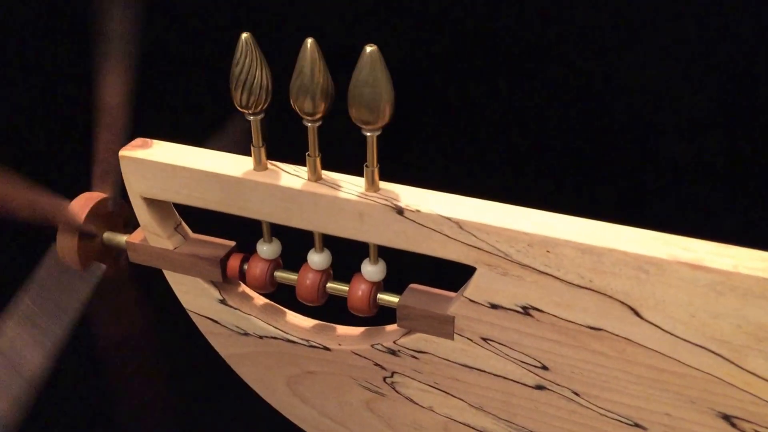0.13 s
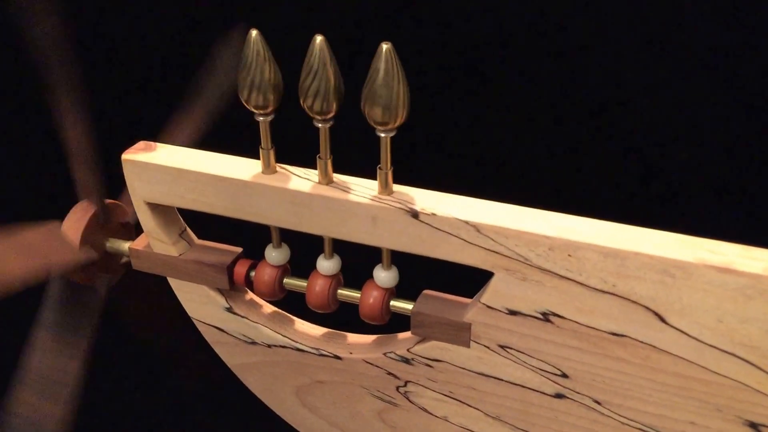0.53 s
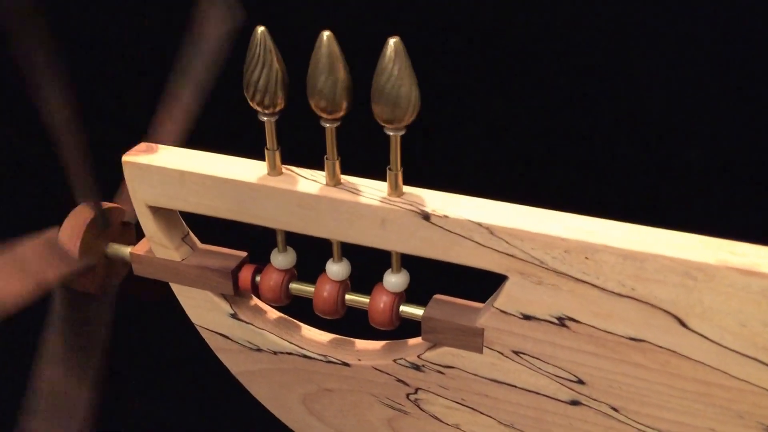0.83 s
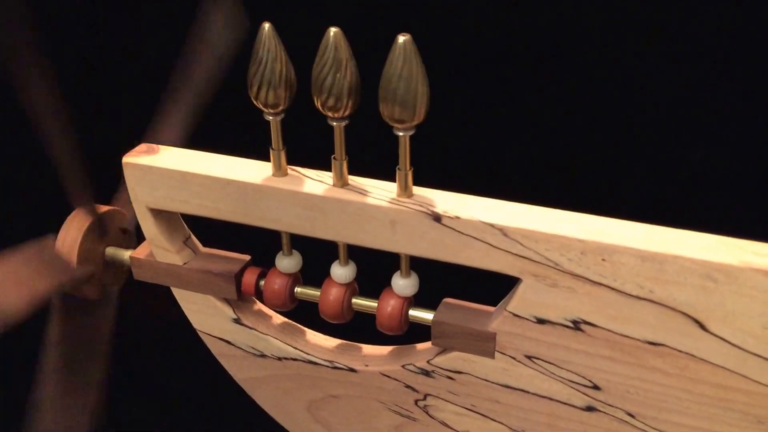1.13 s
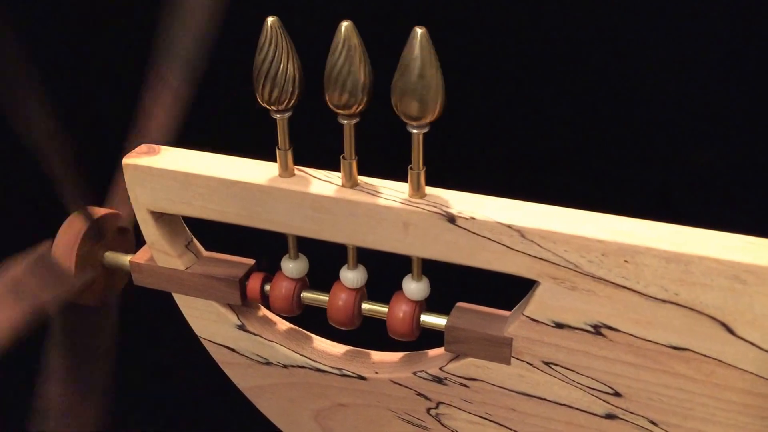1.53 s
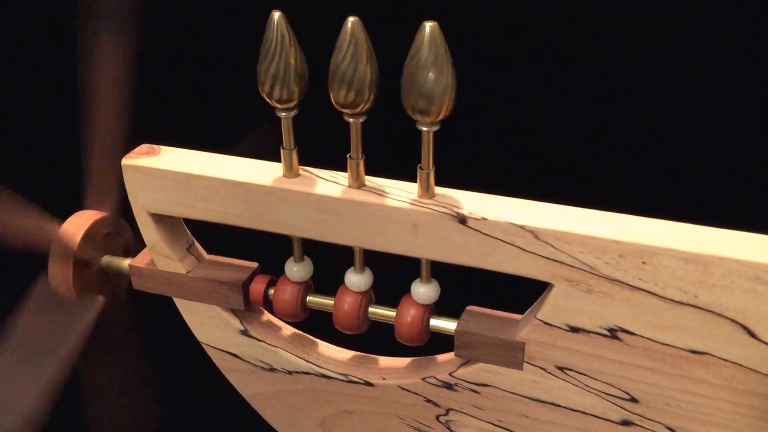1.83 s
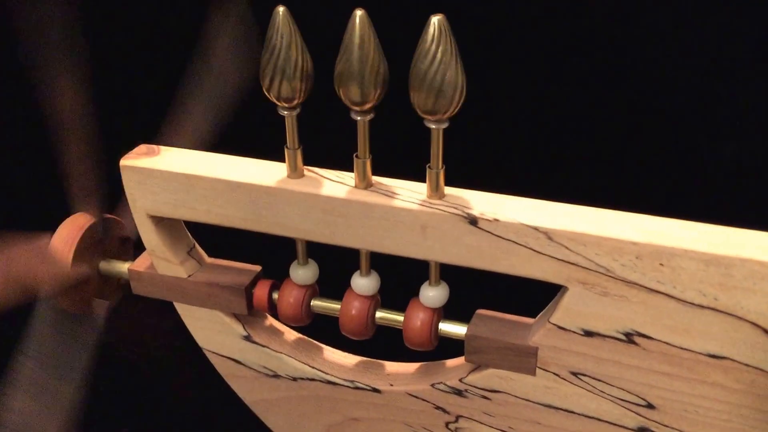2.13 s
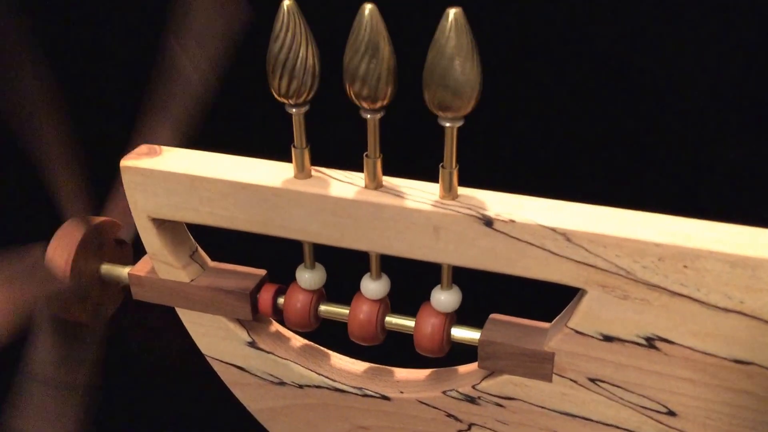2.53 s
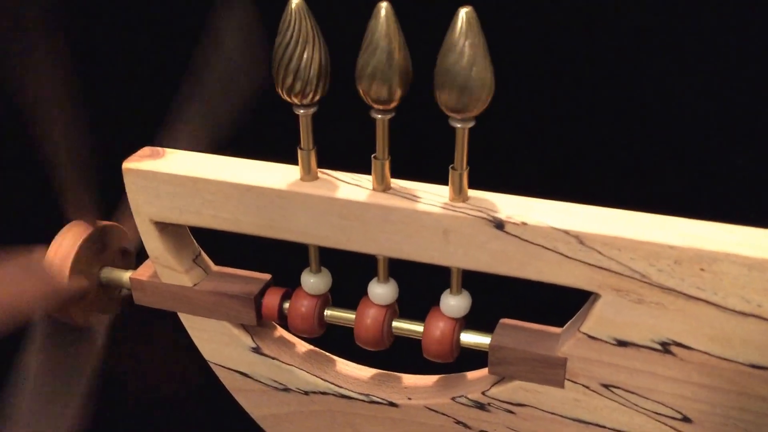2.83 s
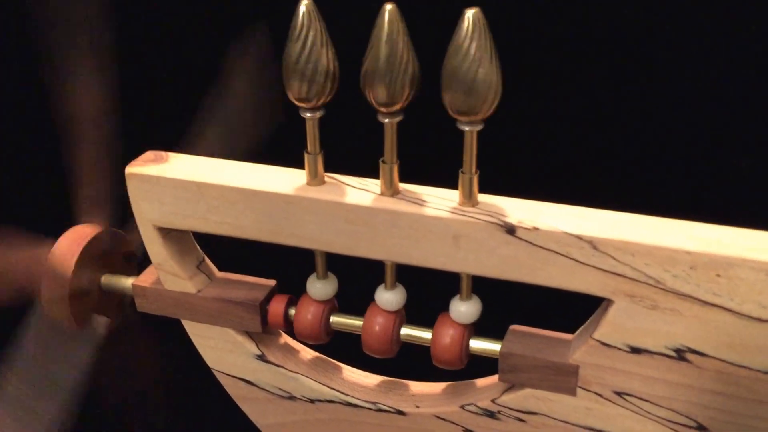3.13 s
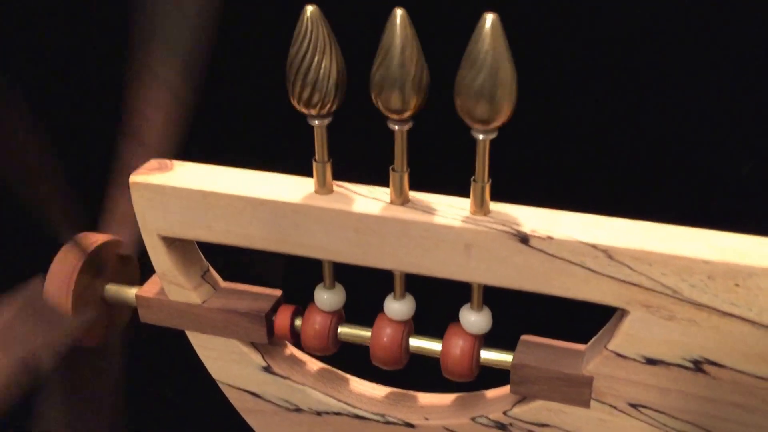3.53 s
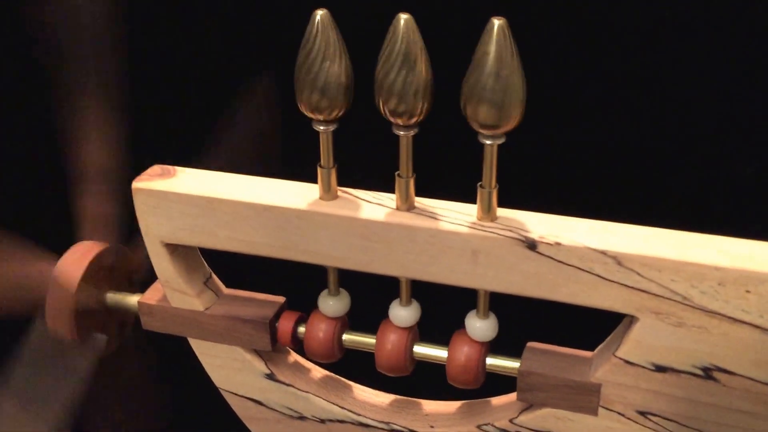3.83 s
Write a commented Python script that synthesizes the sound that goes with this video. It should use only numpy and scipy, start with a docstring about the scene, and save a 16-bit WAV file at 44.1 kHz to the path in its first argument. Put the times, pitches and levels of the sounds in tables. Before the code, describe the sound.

Wooden followers rub, tick and chatter on a turning camshaft, sparse at first, dense and bright by the end, with soft draught thumps on a close microphone and quiet room hum beneath.

```python
"""For four seconds a propeller turns the camshaft of a small wooden wind toy, over room noise and a low hum.
It starts with faint scrapes and stray ticks over a hollow, unsteady drone of narrow-band sound near 350 Hz.
As the toy speeds up, its three followers rub, tick and chatter harder and more often, and the hull rings
with them: each contact is noise through the hull's resonances. Puffs of the draught, short bands of low noise,
thump on the close microphone, most heavily near 2.8 s; by the end the chatter and ticks are dense and bright."""
import sys
import numpy as np
from scipy import signal
from scipy.fft import rfft, irfft, next_fast_len
from scipy.io import wavfile
from scipy.ndimage import map_coordinates

SR = 44100
rng = np.random.default_rng(int(sys.argv[2]) if len(sys.argv) > 2 else 0)


def unload_wav(signal):
    """Save mono or channel-first audio to the path in sys.argv[1] as 16-bit WAV at rate SR, clipped to [-1, 1]."""
    wavfile.write(
        sys.argv[1],
        SR,
        np.round(np.clip(np.atleast_2d(signal).T, -1, 1) * 32767).astype(np.int16),
    )


N = 176400

# Steady room noise. Each row: frequency in Hz, relative level in dB.
AIR_COLOUR = [(20, -10), (45, -1), (80, 4), (150, 0.5), (260, -5.5), (450, -13.5), (570, -11.5), (800, -19),
              (2000, -23), (5000, -27), (10000, -30.5), (15000, -34)]
# The drone's noise band over time. Each row: time in seconds, level in dB.
DRONE_LEVEL = [(0, -72), (2, -63.5), (4, -61.5)]
# Moments when the drone's narrow band is randomly higher. Each row: time of the peak in seconds, level in dB.
DRONE_FLUCTUATIONS = [(0.058, -59), (.19, -59), (0.286, -60), (0.623, -57), (1.1, -56), (1.732, -56),
                      (2.28, -60), (2.931, -53.5), (3.34, -50), (3.82, -52)]
# Puffs of air on the microphone. Each row: start in seconds, length in seconds, level in dB, upper edge in Hz.
AIR_PUFFS = [(0.631, 0.05, -55.5, 74.6), (1.284, 0.024, -39, 126), (1.297, 0.019, -40, 217),
             (1.313, 0.056, -48.5, 134), (2.31, 0.032, -38, 148), (2.361, 0.076, -39.5, 93),
             (2.477, 0.019, -41.5, 342), (2.484, 0.027, -36, 152), (2.512, 0.057, -44, 109),
             (2.607, 0.04, -49.5, 99), (2.671, 0.044, -42, 113), (2.728, 0.076, -38, 237),
             (2.785, 0.028, -35, 183), (2.813, 0.042, -28.5, 181), (2.862, 0.052, -43, 82),
             (3.112, 0.026, -44, 155), (3.159, 0.13, -49, 170), (3.315, 0.024, -39, 120),
             (3.334, 0.046, -52.5, 129), (3.409, 0.062, -47.5, 145), (3.587, 0.11, -55.5, 116),
             (3.885, 0.079, -58, 264)]
# Resonances of the hull and rods. Each row: centre in Hz, width in Hz, lift in dB (centre and lift vary by spot).
HULL_MODES = [(573, 120, 4), (702.5, 20, 11.5), (853, 52, 11), (1111, 160, 12.5), (1478, 205, 8),
              (1933, 194, 8), (2568, 430, 10), (3095, 410, 12.5), (3496, 406, 10.5), (4395, 367, 10.5),
              (5770, 335, 10), (6460, 230, 7.5), (7510, 290, 9.5), (8630, 370, 4.5), (9480, 550, 8),
              (11170, 560, 11.5)]
# Colour of the rubbing under the hull modes. Each row: frequency in Hz, relative level in dB.
RUB_COLOUR = [(200, -17.5), (450, -31.5), (580, -14), (780, -24.5), (970, -8.5), (1180, 8.5), (1550, -3),
              (2200, -15.5), (4000, -42.5), (15000, -68)]
# Colour of the chatter under the hull modes. Each row: frequency in Hz, relative level in dB.
CHATTER_COLOUR = [(300, -40.5), (600, -5.5), (1000, -13), (1500, -2), (2200, -7), (3000, 0.5), (5000, -13),
                  (7000, -23.5), (10400, -35.5), (15000, -48.5)]
# Colour of a tick under the hull modes. Each row: frequency in Hz, relative level in dB.
TICK_COLOUR = [(300, -23.5), (1200, -6), (2200, -12), (3200, 1), (5500, -13), (7000, -22.5), (10400, -28.5),
               (15000, -36.5)]
# Contact between the scrapes. Each row: time in seconds, rubbing in dB, chatter in dB, both before the mix trims.
RUNNING_LEVEL = [(0, -66, -77.5), (.8, -64.5, -72), (1.55, -62.5, -72.5), (2.0, -60, -65),
                 (2.5, -54.5, -60), (3.0, -51, -57.5), (3.4, -51, -54), (4, -53.5, -48.5)]
# Scrapes of the followers on the cams. Each row: start in seconds, length in seconds, rubbing in dB,
# chatter in dB, both before the mix trims.
CAM_SCRAPES = [(0.151, 0.045, -58.5, -76), (0.249, 0.011, -56, -70), (0.346, 0.01, -52.5, -78),
               (0.379, 0.057, -58.5, -68.5), (0.458, 0.057, -64, -66), (0.582, 0.075, -53.5, -66),
               (0.878, 0.0086, -51, -72), (0.987, 0.037, -57, -78), (1.096, 0.058, -57, -62.5),
               (1.333, 0.054, -52, -60), (1.397, 0.04, -52, -58), (1.506, 0.016, -55, -63.5),
               (1.618, 0.055, -53.5, -54), (1.694, 0.035, -55, -59.5), (1.75, 0.1, -51.5, -53),
               (1.868, 0.027, -49.5, -57), (1.975, 0.13, -51, -52.5), (2.112, 0.072, -55, -58),
               (2.207, 0.025, -47.5, -52.5), (2.301, 0.033, -55, -52), (2.368, 0.09, -52, -51.5),
               (2.518, 0.027, -47.5, -47), (2.562, 0.058, -50.5, -47.5), (2.64, 0.12, -52, -47.5),
               (2.77, 0.062, -54, -50), (2.847, 0.11, -56, -48.5), (3.011, 0.21, -60, -51),
               (3.136, 0.056, -45.5, -48), (3.256, 0.037, -50.5, -43.5), (3.307, 0.072, -46.5, -45.5),
               (3.455, 0.081, -63, -45), (3.53, 0.17, -49.5, -43), (3.697, 0.082, -49.5, -46),
               (3.782, 0.03, -49, -52.5), (3.878, 0.1, -48.5, -41)]
# Distinct ticks of a follower landing. Each row: time in seconds, level in dB, hardness as treble lift in dB.
LANDINGS = [(.176, -48.5, 13), (0.405, -48, -5), (0.498, -38.5, 11), (.888, -46.5, 8), (1.119, -40.5, -16),
            (1.246, -42, 12), (1.341, -45.5, 20), (1.345, -38, -13), (1.369, -30, 11), (1.377, -32.5, 1.5),
            (1.622, -38, 5), (1.629, -34, 3), (1.633, -29.5, 1), (1.76, -39, 6), (1.766, -34, -14),
            (1.879, -32, 5), (1.975, -36, 0), (1.998, -36.5, 4), (2.05, -35, 11), (2.109, -32, 2),
            (2.121, -38, 0), (2.218, -35.5, 5.5), (2.27, -42, 9), (2.315, -31, -6), (2.387, -36.5, -15),
            (2.44, -35, 1), (2.541, -38, 0), (2.579, -31, -1), (2.585, -29, 5), (2.611, -32, 4),
            (2.652, -33, 9.5), (2.66, -32, 2.5), (2.671, -36, 0), (2.686, -37, 4), (2.693, -36, 6),
            (2.708, -36, -1), (2.717, -31.5, -1), (2.744, -32.5, -3), (2.754, -34, -1), (2.784, -24.5, 4.5),
            (2.794, -32.5, 9), (2.811, -37, -4), (2.884, -32.5, 0), (2.902, -27.5, 3), (2.925, -31.5, 5),
            (2.931, -39, 1), (2.977, -35.5, -2), (3.146, -35, -8), (3.154, -32.5, 6), (3.162, -33, 14),
            (3.168, -28, 3), (3.185, -35, 7), (3.242, -28.5, 11.5), (3.271, -34.5, 3), (3.299, -30.5, 10),
            (3.353, -30, 9), (3.439, -31, 2), (3.472, -34.5, 5), (3.481, -34, -6), (3.491, -29.5, 2),
            (3.55, -29, -14), (3.559, -29.5, -8), (3.602, -27.5, -3), (3.605, -24.5, 10),
            (3.616, -29.5, -1), (3.655, -32, 13), (3.671, -28.5, 2), (3.684, -35, -5), (3.711, -30, -3),
            (3.734, -30.5, -4), (3.772, -30, 5), (3.795, -29, 3), (3.821, -33.5, 3), (3.881, -31, -4),
            (3.916, -27, 7), (3.925, -29, 10), (3.94, -28.5, 15), (3.951, -29, 16), (3.959, -25, 14)]

AIR_DB = -64.5
HUM_HZ, HUM_DB = 120, -65.5
DRONE_HZ, DRONE_WIDTH_HZ = 350.2, 46.3
FLUCTUATION_S = 0.017  # from the peak of a fluctuation to 1/e of its height
PUFF_LOW_HZ, PUFF_EDGE_S = 44, 0.0057
PUFF_TILT = 0.4  # a puff's spectrum falls with frequency to this power
ROOM_T60_S, ROOM_DB = 0.062, -4.5
HARD_HZ = 4800  # hard contacts lift the treble above this
SPOT_SPREAD, MODE_DRIFT = 0.18, 0.015  # relative spread of each mode's lift and frequency
SPOT_OCTAVES = 0.11  # how far a contact's colour shifts from spot to spot, either way
CONTACT_T60_S = 0.0089
GAP_SPREAD = 0.7  # unevenness of the gaps between bounces
RUB_PER_S, CHATTER_PER_S = 1500, 260  # micro-impacts a second
CHATTER_SCATTER_DB = 2
SCRAPE_ATTACK_S, SCRAPE_RELEASE_S = 0.01, 0.016
BRIGHT_FROM_DB, BRIGHT_GROWTH = -52.5, 0.46  # above this level chatter's treble gains so many dB per dB
RUB_TRIM_DB, CHATTER_TRIM_DB = -3.5, -4.5
TICK_LEAD_S, TICK_DECAY_S = 0.0011, 0.0018  # time constants of the contact's build-up and decay
TICK_BODY_S = 0.00021  # a tick holds the energy of its level sustained this long
TOP_HZ = 15400


def amp(db):
    """Decibels to gain."""
    return 10 ** (np.asarray(db) / 20)


def unit(x):
    """Scale to rms 1."""
    return x / np.sqrt(np.mean(x ** 2) + 1e-20)


def along(points, hz):
    """Read a (Hz, value) curve on a log frequency axis."""
    f, v = np.transpose(points)
    return np.interp(np.log(hz + 1), np.log(f + 1), v)


def curves(rows):
    """One value per sample for each column after the time."""
    s, *columns = np.transpose(rows)
    return [np.interp(np.arange(N) / SR, s, column) for column in columns]


def wobble(rate):
    """A smooth random curve with rate knots a second."""
    knots = rng.standard_normal(N // 100)
    return map_coordinates(knots, [np.arange(N) * rate / SR], mode="mirror")


def filtered(x, response):
    """Shape the spectrum of x by a response of frequency."""
    m = next_fast_len(len(x) + SR // 4)
    hz = np.fft.rfftfreq(m, 1 / SR)
    return irfft(rfft(x, m) * response(hz), m)[:len(x)]


def gate(start, length, attack, release):
    """Linear attack and release, centred on the start and end of a hold."""
    t = np.arange(N) / SR - start
    rise = np.clip(t / attack + .5, 0, 1)
    fall = np.clip((length - t) / release + .5, 0, 1)
    return rise * fall


def burst(t60, size=8192):
    """Exponentially decaying noise of energy 1."""
    x = rng.standard_normal(size) * np.exp(-np.log(1000) * np.arange(size) / SR / t60)
    return x / np.linalg.norm(x)


def treble(hz):
    """The high band that hard contacts lift."""
    return 1 - 1 / (1 + (hz / HARD_HZ) ** 6)


def background():
    """Coloured room noise, a sine hum, and an unsteady drone: narrow noise plus brief phase-wavering tone."""
    t = np.arange(N) / SR
    air = unit(filtered(rng.standard_normal(N), lambda hz: amp(along(AIR_COLOUR, hz))))
    hum = np.sqrt(2) * np.sin(2 * np.pi * HUM_HZ * t)

    def drone_band(hz):
        return 1 / (1 + (2 * (hz - DRONE_HZ) / DRONE_WIDTH_HZ) ** 2)

    drone = unit(filtered(rng.standard_normal(N), drone_band))
    fluctuation = sum(amp(db) * np.exp(-((t - s) / FLUCTUATION_S) ** 2) for s, db in DRONE_FLUCTUATIONS)
    tone = np.sqrt(2) * np.sin(2 * np.pi * DRONE_HZ * t + 1.9 * wobble(25))  # the phase wavers
    drone_level = amp(curves(DRONE_LEVEL)[0])
    return amp(AIR_DB) * air + amp(HUM_DB) * hum + drone_level * drone + fluctuation * tone


def draught(size=16384):
    """Each puff on the microphone is a short low rumble of band noise with a steep upper edge."""
    out = np.zeros(N + SR)
    t = np.arange(size) / SR
    for start, length, db, edge_hz in AIR_PUFFS:
        def band(hz):
            low_cut = 1 - 1 / (1 + (hz / PUFF_LOW_HZ) ** 4)
            high_cut = 1 / np.sqrt(1 + (hz / edge_hz) ** 9)
            return low_cut * high_cut / (hz + 1) ** PUFF_TILT

        to_edge = np.minimum(t, length + PUFF_EDGE_S - t)
        shape = np.sin(np.pi / 2 * np.clip(to_edge / PUFF_EDGE_S, 0, 1)) ** 2
        swirl = signal.hilbert(filtered(rng.standard_normal(2 * size), band))[size // 2:][:size]
        steadied = swirl.real / np.abs(swirl) ** 0.094  # slightly evens out the noise's envelope
        puff = filtered(shape * steadied, lambda hz: 1 - 1 / (1 + (hz / 33) ** 4))
        puff *= np.sqrt(length * SR / np.sum(puff ** 2))
        out[round((start - PUFF_EDGE_S / 2) * SR):][:size] += amp(db) * puff
    return out[:N]


def room(x, count=40):
    """Short diffuse reflections; a fresh random tail for each slice keeps the room's average colour even."""
    out = np.zeros(N + SR)
    for part in np.array_split(np.arange(N), count):
        echo = signal.fftconvolve(x[part], burst(ROOM_T60_S))
        out[part[0]:][:len(echo)] += echo
    return out[:N]


def ring(colour, hard_db=0, size=2048):
    """The hull's causal answer to one contact; each spot stirs and shifts its broad groups of modes."""
    hz = np.fft.rfftfreq(size, 1 / SR)
    stir = 1 + SPOT_SPREAD * rng.standard_normal(len(HULL_MODES))
    drift = 1 + MODE_DRIFT * rng.standard_normal(len(HULL_MODES))
    shift = 2 ** (SPOT_OCTAVES * rng.uniform(-1, 1))
    db = along(colour, hz * shift) + hard_db * treble(hz)
    for g, d, (f, width, lift) in zip(stir, drift, HULL_MODES):
        db = db + g * lift / (1 + (2 * (hz - f * d) / width) ** 4)
    # folding the cepstrum gives minimum phase: the answer starts at the contact
    cepstrum = irfft(np.log(amp(db)))
    cepstrum[1:size // 2] *= 2
    cepstrum[size // 2 + 1:] = 0
    return irfft(np.exp(rfft(cepstrum)))


def impacts(level, per_s, colour, scatter_db, count=24, size=16000):
    """Small bounces at uneven gaps on count contact spots, ringing the hull at the given level."""
    gaps = 1 + GAP_SPREAD * rng.uniform(-1, 1, size)
    at = (np.cumsum(gaps) * SR / per_s).astype(int)
    scatter = amp(scatter_db * np.clip(rng.standard_normal(N), -2, 2))
    bounces = np.bincount(at[at < N], minlength=N) * scatter
    bounces = unit(bounces * rng.choice([-1, 1], N)) * level
    spot = rng.integers(count, size=N)
    out = np.zeros(N)
    for k in range(count):
        answer = signal.fftconvolve(ring(colour), burst(CONTACT_T60_S, size=1024))
        out += signal.oaconvolve(bounces * (spot == k), answer / np.linalg.norm(answer))[:N]
    return out


def followers():
    """Followers on cams: fine, dull rubbing with a coarser chatter on top that brightens as it grows."""
    rub_power, chatter_power = amp(curves(RUNNING_LEVEL)) ** 2
    for start, length, rub_db, chatter_db in CAM_SCRAPES:
        shape = gate(start, length, SCRAPE_ATTACK_S, SCRAPE_RELEASE_S) ** 2
        rub_power = rub_power + shape * amp(rub_db) ** 2
        chatter_power = chatter_power + shape * amp(chatter_db) ** 2
    rub_level = np.sqrt(rub_power) * amp(0.29 * wobble(40))
    rubbing = impacts(rub_level, RUB_PER_S, RUB_COLOUR, scatter_db=0)
    chatter_level = np.sqrt(chatter_power) * amp(2.0 * wobble(60))
    chatter = impacts(chatter_level, CHATTER_PER_S, CHATTER_COLOUR, CHATTER_SCATTER_DB)
    lift_db = BRIGHT_GROWTH * np.maximum(10 * np.log10(chatter_power) - BRIGHT_FROM_DB, 0)
    chatter = chatter + (amp(lift_db) - 1) * filtered(chatter, treble)
    return amp(RUB_TRIM_DB) * rubbing + amp(CHATTER_TRIM_DB) * chatter


def ticks(size=1024):
    """A follower lands: a brief grinding contact builds and dies within milliseconds and rings the hull."""
    out = np.zeros(N + SR)
    t = (np.arange(size) - size // 2) / SR
    shape = np.exp(np.minimum(t / TICK_LEAD_S, -t / TICK_DECAY_S))
    for s, db, hard_db in LANDINGS:
        answer = ring(TICK_COLOUR, hard_db)
        grind = shape * rng.standard_normal(size)
        tick = signal.fftconvolve(answer, grind)
        tick *= np.sqrt(TICK_BODY_S * SR / np.sum(tick ** 2))
        out[round(s * SR) - size // 2:][:len(tick)] += amp(db) * tick
    return out[:N]


def scene():
    """The toy in its small room, with the draught and the background."""
    toy = followers() + ticks()
    return (toy + amp(ROOM_DB) * room(toy) + draught() + background())[None]


def record(dry):
    """Nothing is kept above the band limit."""
    return np.array([filtered(x, lambda hz: hz < TOP_HZ) for x in dry])


dry = scene()
out = record(dry)
unload_wav(out)
```